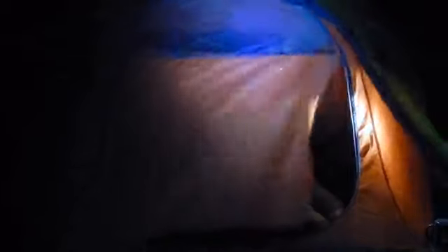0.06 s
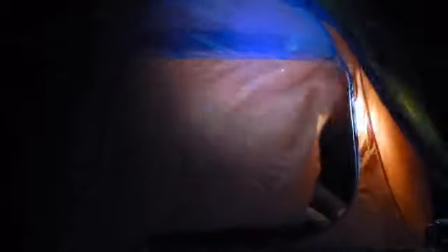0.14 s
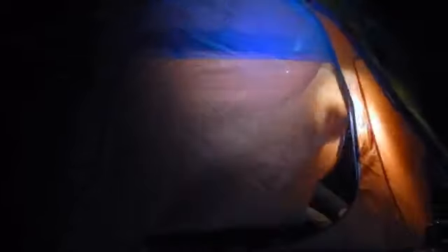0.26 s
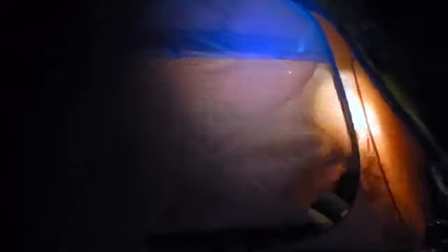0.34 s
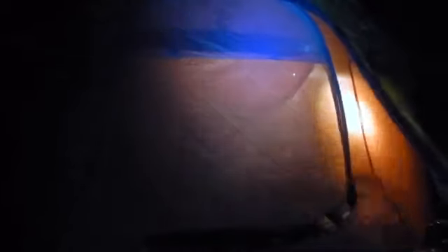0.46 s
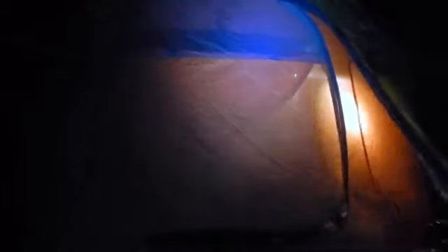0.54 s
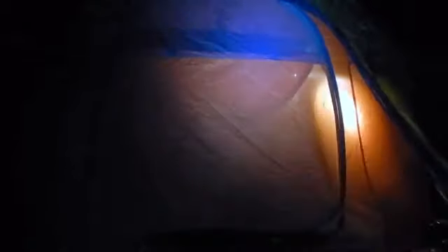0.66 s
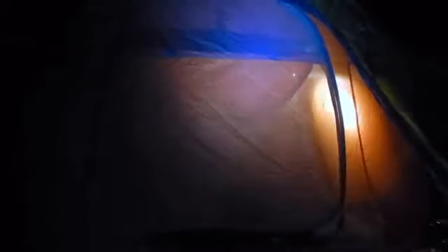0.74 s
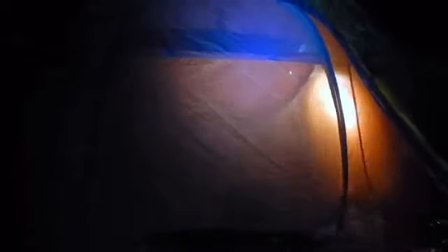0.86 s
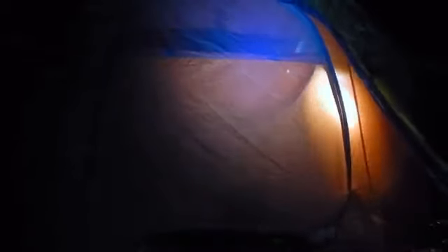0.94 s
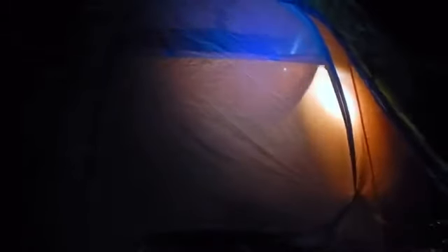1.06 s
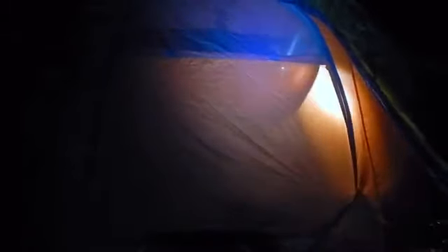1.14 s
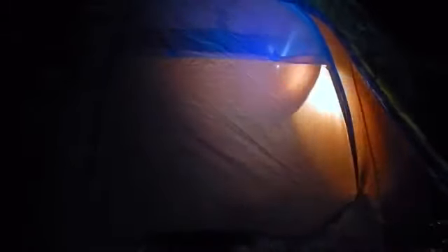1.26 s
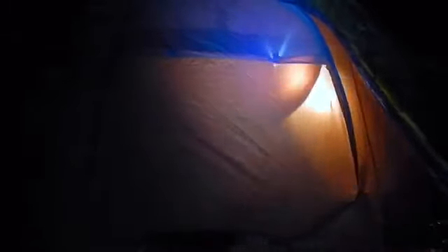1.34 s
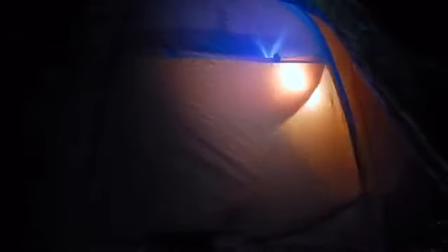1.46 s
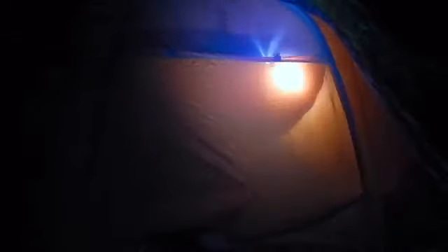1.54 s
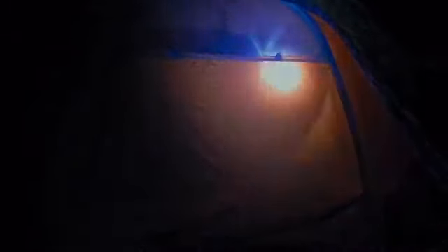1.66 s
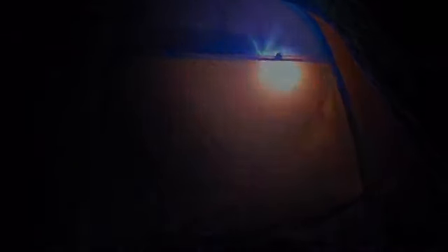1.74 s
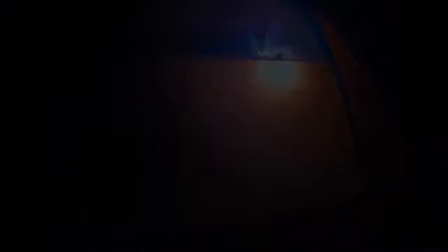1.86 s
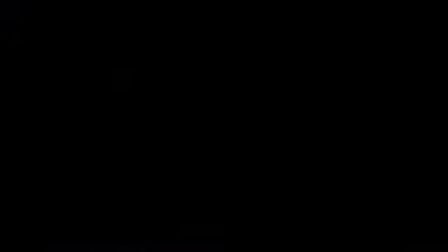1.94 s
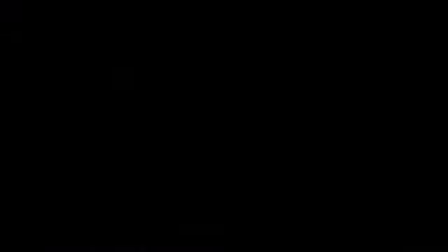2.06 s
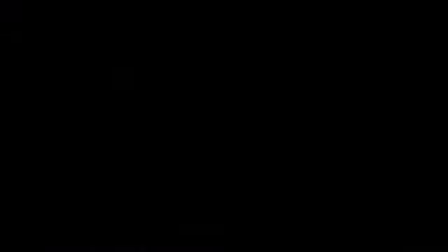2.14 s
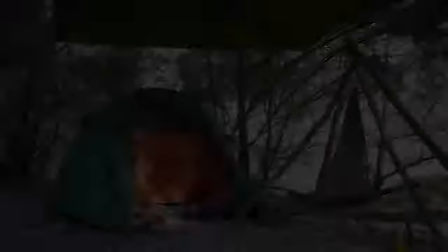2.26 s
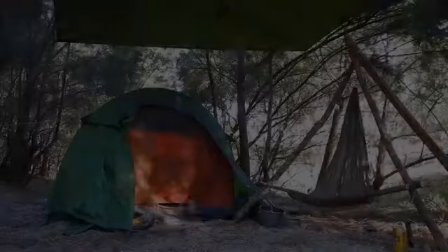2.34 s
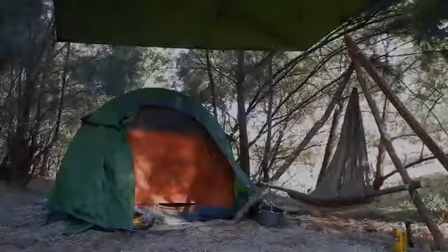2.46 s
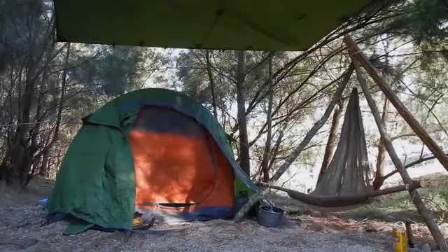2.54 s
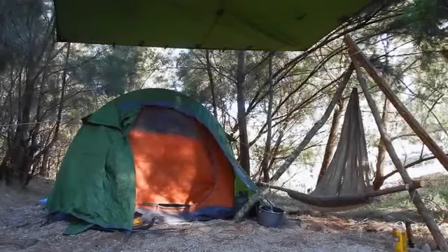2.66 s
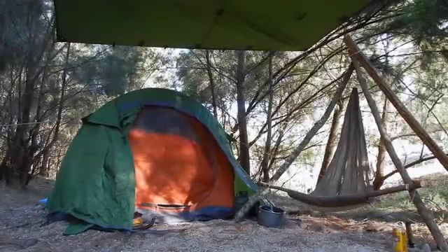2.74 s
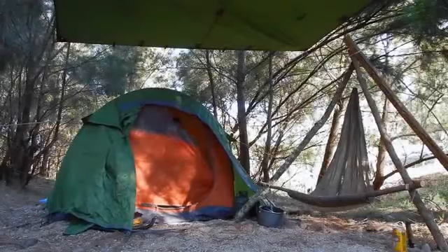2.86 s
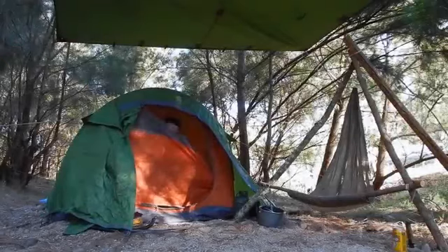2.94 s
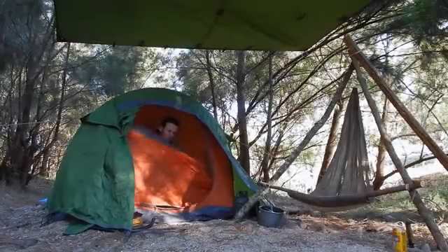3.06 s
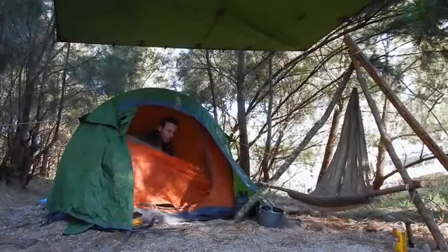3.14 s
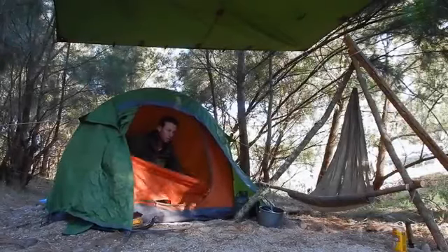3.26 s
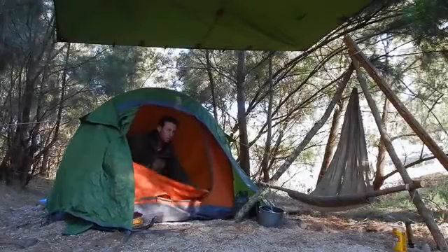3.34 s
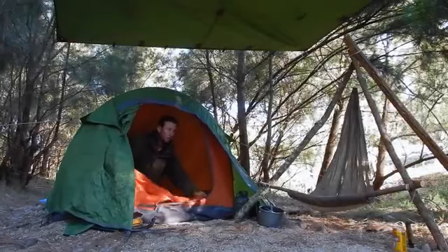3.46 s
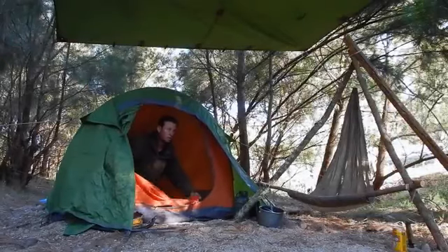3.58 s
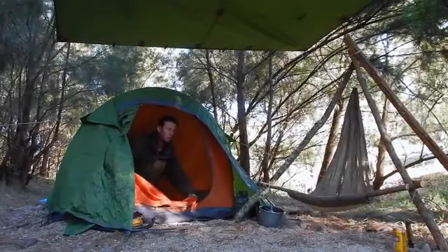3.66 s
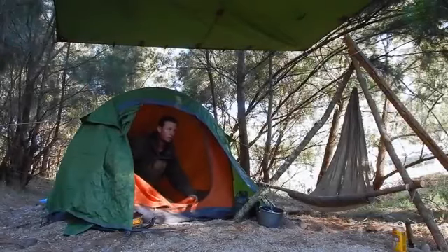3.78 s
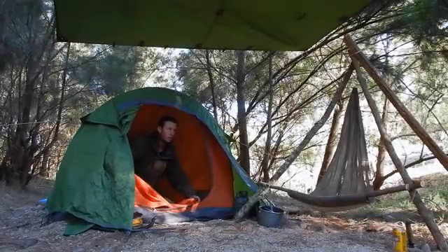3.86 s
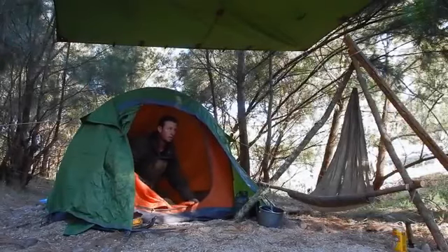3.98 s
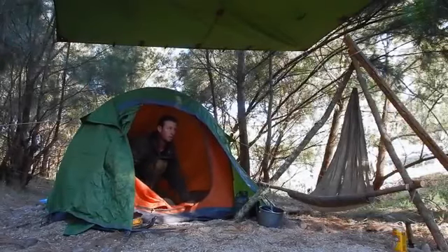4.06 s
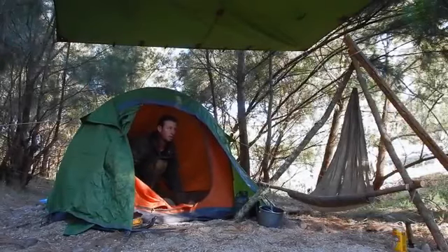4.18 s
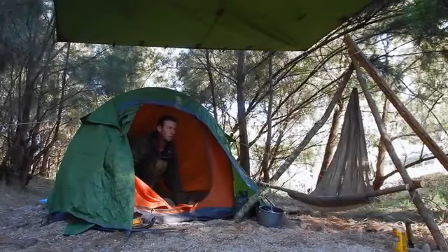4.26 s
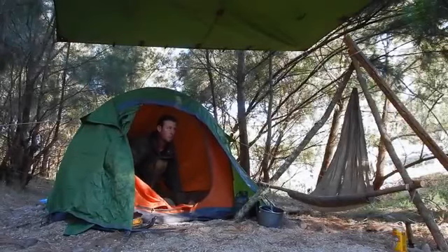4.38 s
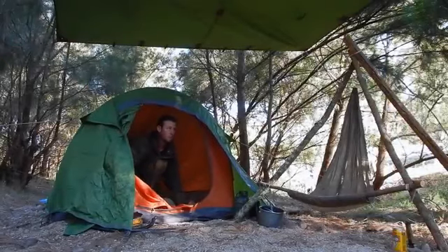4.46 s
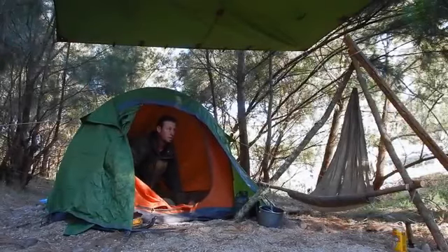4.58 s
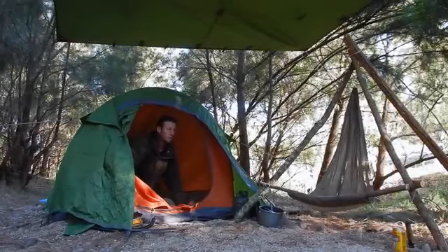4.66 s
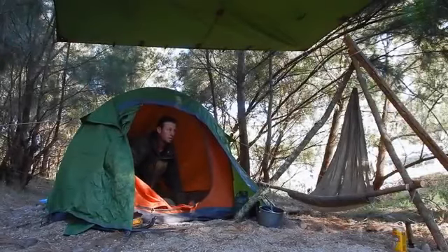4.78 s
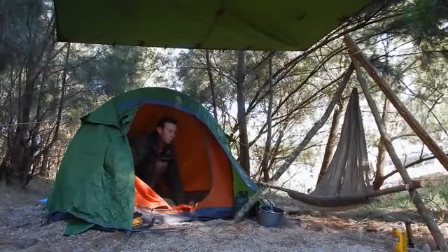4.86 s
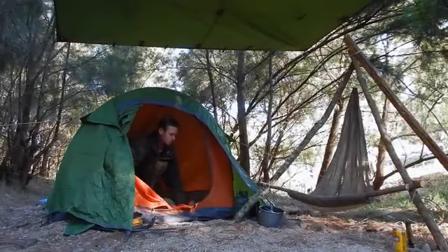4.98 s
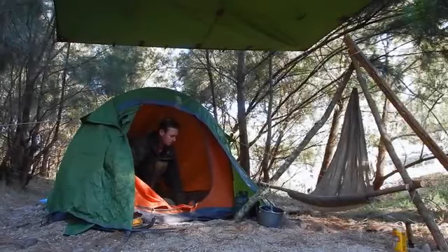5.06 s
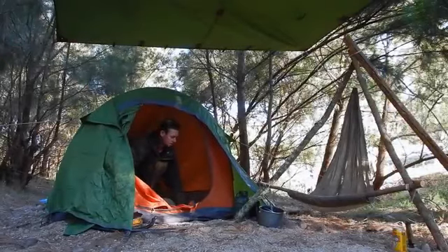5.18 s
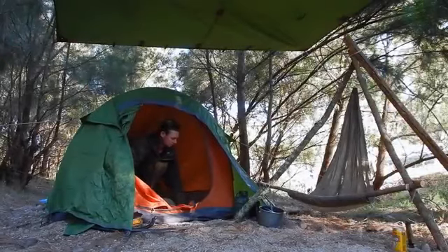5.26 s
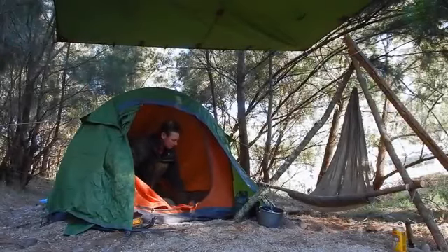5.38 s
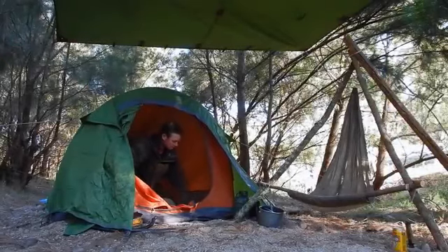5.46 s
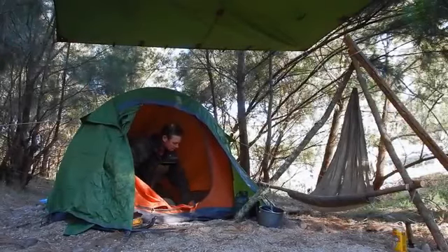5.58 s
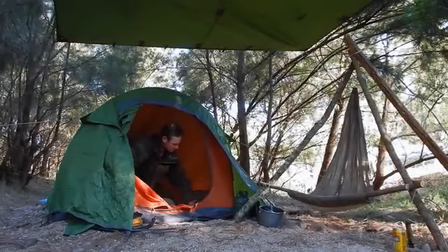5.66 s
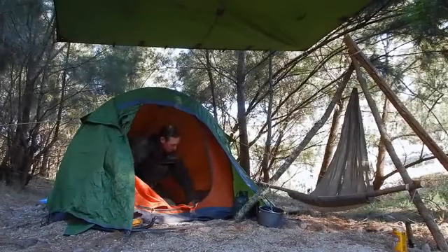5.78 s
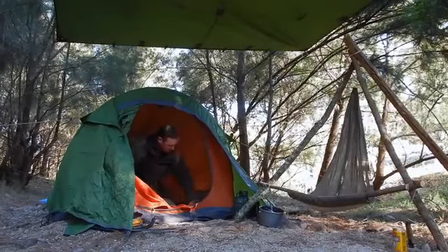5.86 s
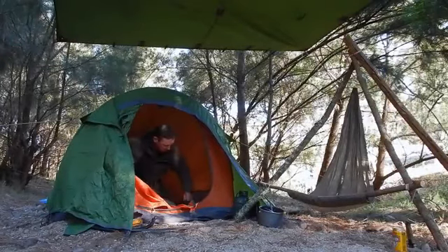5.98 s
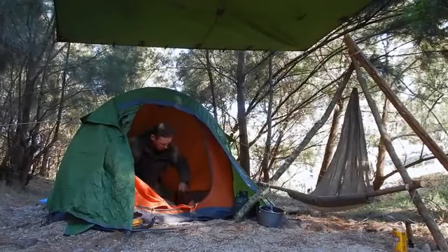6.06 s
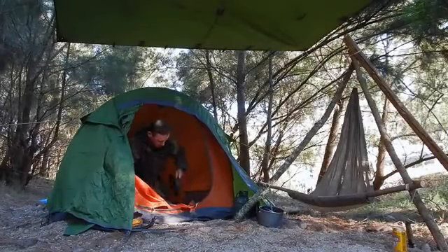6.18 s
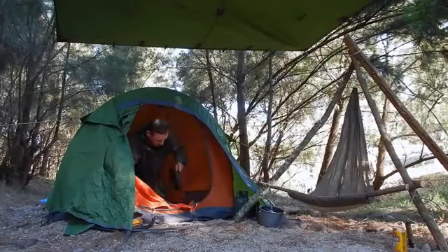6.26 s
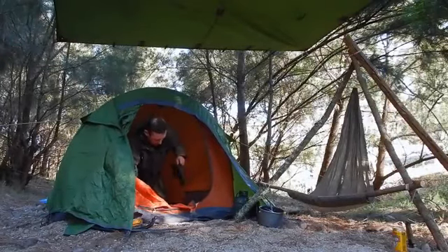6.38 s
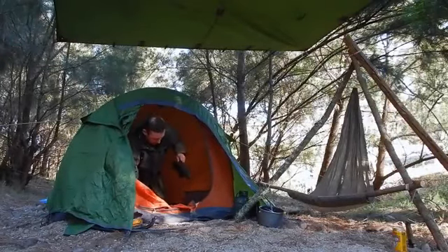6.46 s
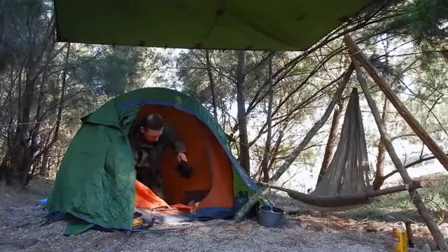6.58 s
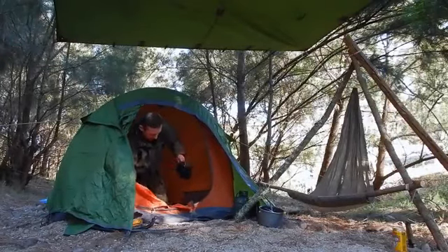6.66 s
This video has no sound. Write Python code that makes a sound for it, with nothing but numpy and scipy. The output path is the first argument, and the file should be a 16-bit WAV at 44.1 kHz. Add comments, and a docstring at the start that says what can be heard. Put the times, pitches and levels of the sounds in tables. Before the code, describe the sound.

Close, buzzing zip with stops and tugs, then a softer, quicker unzip farther away, small birds chirping, nylon rustling, insects droning behind.

```python
"""A zip buzzes close by as a tent door is shut, then more faintly as it is opened a few metres away.
Tooth impacts, friction noise and a hum at the tooth rate are shaped by tape and panel resonances;
the door flutters as filtered noise and thumps as damped modes. Small birds chirp as gliding sines,
nylon rustles as filtered noise, and behind them filtered noise makes a droning insect chorus
and a low rumble."""
import sys
import numpy as np
from scipy import signal
from scipy.fft import rfft, irfft, next_fast_len
from scipy.io import wavfile

SR = 44100
rng = np.random.default_rng(int(sys.argv[2]) if len(sys.argv) > 2 else 0)


def inscribe(sig):
    """Save sig as 16-bit PCM at rate SR to the path in sys.argv[1].

    A 1-D sig is mono; a 2-D sig holds one channel per row.
    Samples are clipped to [-1, 1] before scaling.
    """
    pcm = np.round(np.clip(np.atleast_2d(sig).T, -1, 1) * 32767)
    wavfile.write(sys.argv[1], SR, pcm.astype(np.int16))


N = 296352
TIME = np.arange(N) / SR
# teeth per s: above it the rattle fades, below it the overtones of the hum fade
SMOOTH_RATE = 940

# the slider's path close by, in four goes:
# t/s, tooth rate/(1/s), force/dB (only its change about the mean counts), freedom of the cloth to hum/dB
FIRST_PULL = [(0.0, 500, -25, 4.5), (0.028, 586, -25, -0.5), (0.064, 654, -24.5, 1), (0.088, 820, -21, 1.5),
              (0.108, 826, -22.5, 0.5), (0.128, 980, -24.5, 1.5), (0.146, 980, -24, -4.5),
              (0.16, 950, -24, 1), (0.18, 1050, -27.5, -7.5), (0.2, 948, -27.5, -3), (0.216, 674, -28, -14),
              (0.24, 645, -27.5, -6), (0.253, 545, -26.5, -13), (0.266, 337, -32, -5), (.285, 300, -34, -2)]
SECOND_PULL = [(0.308, 304, -35, -4), (0.334, 466, -32, -3), (0.348, 585, -29.5, -11),
               (0.366, 806, -32.5, 3), (0.41, 1055, -25.5, -21), (0.434, 1196, -26.5, -3),
               (0.458, 1228, -25.5, -0.5), (0.492, 1162, -27.5, -2), (0.512, 1056, -26, 1.5),
               (0.53, 897.4, -30, -5.5), (0.566, 682.3, -31, -7.5), (0.65, 456, -34, -4),
               (0.69, 553.7, -34.5, -5.5), (0.72, 585, -31.5, -4), (0.75, 489, -35, -7),
               (0.798, 245.9, -38, -1), (0.825, 160.2, -60, -1)]
CREEP = [(.87, 165, -48, 1), (.94, 185.2, -46.5, 0), (1.021, 125.2, -54, -3)]
SLOW_PULL = [(1.055, 214.4, -42, -2), (1.1, 228.3, -37.5, -0.5), (1.122, 285.5, -38.5, 4),
             (1.15, 230, -35.5, -2), (1.175, 294.8, -34, -1), (1.209, 268, -38.5, 1.5),
             (1.245, 305.2, -35, 6.5), (1.268, 304.4, -34.5, 4.5), (1.282, 349.6, -32, -2),
             (1.32, 379.6, -34, 2.5), (1.357, 361, -33, -2), (1.392, 404.3, -31, 4.5),
             (1.415, 399.6, -34, -3), (1.452, 459, -31.5, 0), (1.517, 270.3, -30.5, 1.5),
             (1.545, 370.3, -27.5, -3), (1.575, 489.5, -28, 0.5), (1.605, 458, -24, 1),
             (1.628, 488, -26, -3), (1.655, 465.7, -26.5, 2), (1.685, 399, -28, -2),
             (1.705, 479, -28.5, 0.5), (1.722, 500, -33.5, -1), (1.745, 570.5, -31, 1),
             (1.776, 580.4, -30, -6), (1.805, 624.8, -30, -3.5), (1.86, 630, -32, -7.5),
             (1.905, 595.3, -32, -0.5), (1.95, 439.4, -33, 1.5), (2.0, 374.2, -43, -3)]
LAST_TUG = [(2.03, 299.7, -39, -0.5), (2.052, 340, -43, 4), (2.064, 411, -34, 7), (2.078, 512.3, -31, 5),
            (2.096, 787.3, -27, -8), (2.115, 913, -28, -1.5), (2.138, 957, -25, -4),
            (2.152, 1047, -28.5, -14), (2.168, 1004, -32.5, -13), (2.185, 420, -36, -14),
            (2.222, 471.7, -31, -17), (2.26, 258, -43, -17)]
# resonances of the door panel, which differ from go to go: f/Hz, relative level/dB
FIRST_PANEL = [(290, -0.5), (400, -4), (500, -8.5), (600, 0.5), (665, -1), (710, -7), (790, -14), (900, 1),
               (980, 0), (1050, -1.5), (1200, 7), (1330, -10), (1480, 1), (1700, 5), (1870, -2),
               (2050, 6.5)]
SECOND_PANEL = [(200, 0.5), (300, -9), (400, -8), (480, 3), (580, 3), (680, 0), (800, 2), (900, 0.5),
                (1100, -18), (1230, -15), (1400, 11), (1650, -6), (1900, 9), (2100, 14.5), (2330, 14),
                (2470, 5.5)]
SLOW_PANEL = [(130, -9), (220, 3.5), (300, -2.5), (400, -1), (470, 2.5), (570, 0.5), (640, -6.5), (750, -4),
              (950, -16), (1140, -4), (1300, 4)]
LAST_PANEL = [(300, 2.5), (430, 5), (520, 1), (680, -26), (800, -7), (960, 4), (1200, 5), (1600, -1),
              (1820, 10.5), (2100, -4)]
GOES = [(FIRST_PULL, FIRST_PANEL), (SECOND_PULL, SECOND_PANEL),
        (CREEP + SLOW_PULL, SLOW_PANEL), (LAST_TUG, LAST_PANEL)]
# slackness of the closing door: t/s, level/dB
SLACK = [(.03, -17.5), (.11, -8), (.18, -5), (.24, -1), (.45, -4), (.7, -5.5), (1.05, -1), (1.65, -1),
         (1.85, 2), (2.14, 3), (2.26, -2)]


def from_db(db):
    """Amplitude ratio: a gain of ten for every 20 dB."""
    return 10 ** (np.asarray(db) / 20)


def rms_one(x):
    """Normalisation to unit rms amplitude."""
    return x / np.sqrt(np.mean(x ** 2) + 1e-20)


def in_time(rows):
    """Linear interpolation of each column of a curve over time."""
    s, *columns = np.transpose(rows)
    return [np.interp(TIME, s, c) for c in columns]


def at_hz(points, hz):
    """Interpolation of a spectrum on a logarithmic frequency axis."""
    f, value = np.transpose(points)
    return np.interp(np.log(hz + 1e-3), np.log(f), value)


def panned(x, pan_db):
    """Level-difference stereo: half of pan_db is added on the left and taken off on the right."""
    return x * from_db(np.array([[.5], [-.5]]) * pan_db)


def drift(rate):
    """Low-passed Gaussian noise of unit rms: a random fluctuation slower than about `rate` in Hz."""
    # computed on every 20th sample; the first 2000 values let the filter settle
    r = np.exp(-40 * np.pi * rate / SR)
    white = rng.standard_normal(N // 20 + 2002)
    slow = signal.lfilter([1], [1, -2 * r, r * r], white)[2000:]
    return np.interp(np.arange(N) / 20, np.arange(len(slow)), rms_one(slow))


def swells(rows):
    """Sine-squared envelopes, one for each row of t/s, length/s, peak level/dB."""
    return sum(from_db(db) * np.sin(np.pi * np.clip((TIME - s) / length, 0, 1)) ** 2
               for s, length, db in rows)


def response(spectrum, size=4096):
    """Minimum-phase impulse response of unit energy, found by folding the cepstrum."""
    cepstrum = irfft(np.log(from_db(at_hz(spectrum, np.fft.rfftfreq(size, 1 / SR)))))
    cepstrum[1:size // 2] *= 2
    cepstrum[size // 2 + 1:] = 0
    impulse = irfft(np.exp(rfft(cepstrum)))
    return impulse / np.sqrt(np.sum(impulse ** 2))


def coloured(x, spectrum):
    """Convolution of a stereo sound with the impulse response of a body."""
    return signal.oaconvolve(x, response(spectrum)[None], axes=1)[:, :N]


def stereo_noise():
    """White noise whose coherence between left and right varies with frequency."""
    # likeness of left and right: f/Hz, coherence 0-1
    likeness = [(40, 0.9), (125, 0.53), (250, 0.71), (1000, 0.43), (2300, 1), (4000, 0.26), (6000, 0.02),
                (12000, 0)]
    size = next_fast_len(N)
    alike = np.clip(at_hz(likeness, np.fft.rfftfreq(size, 1 / SR)), 0, 1)
    mid, side = rfft(rng.standard_normal((2, size)))
    both = np.sqrt(1 + alike) * mid + np.sqrt(1 - alike) * side * [[1], [-1]]
    return rms_one(irfft(both, size)[:, :N])


def zipper(goes, grinds, hiss_colour, slack_db, hum_db, octave_db, rattle_db, hiss_db, jitter, wobble_db,
           uneven_db, rattle_share, hiss_share, snag_db, grain, hiss_pan_db, tape_db, blur):
    """Periodic excitation: the slider rocks once per tooth, so cloth hums and teeth click and scrape."""
    # the tape's resonances for the upper harmonics: f/Hz, relative level/dB
    tape_rings = [(900, -9), (1100, -3), (1350, -7.5), (1550, -8.5), (1800, -2.5), (2000, -10),
                  (2300, -6.5), (2600, -13.5), (2950, -3), (3200, -18), (3600, -9), (4200, -13),
                  (4800, -10), (5400, -25)]
    # colour of the rattle: f/Hz, relative level/dB
    rattle_colour = [(300, -20.5), (700, -9), (1100, -4), (1500, -3), (2100, 3.5), (2600, 5), (3100, -4.5),
                     (4500, -39.5)]
    hum_follows, rattle_follows = 0.56, 0.96   # dB per dB of force
    rattle_fade_db, overtone_fade_db = 1, 6   # dB per octave of tooth rate
    # dB per dB: a slack door hums less, rattles more and makes the slider run unevenly
    slack_mutes, slack_rattles, slack_jitters = 0.23, 0.46, 0.4035
    # random phase of the hum, and the power by which it grows as the slider slows
    hum_rough, crawl_roughens = .2, .55

    rate, force_db, free_db, moving = hand(goes)
    octaves = np.log2(rate / SMOOTH_RATE)
    drive_db = hum_db + free_db + hum_follows * force_db - slack_mutes * slack_db
    overtone_db = drive_db + overtone_fade_db * np.minimum(octaves, 0)
    teeth_db = rattle_db + rattle_follows * force_db + slack_rattles * slack_db
    teeth_db = teeth_db - rattle_fade_db * np.maximum(octaves, 0)

    # a slow slider sticks and slips, a fast one runs more evenly
    loose = from_db(slack_jitters * slack_db) * np.ones(N)
    rate = rate * np.exp(jitter * loose * (500 / rate) ** .8 * drift(70.22))
    turns = np.cumsum(rate) / SR   # teeth passed so far

    # the panel shapes harmonics 1 and 2, the tape 3 and 4
    lower_db = [drive_db + panel_db(goes, rate), overtone_db + panel_db(goes, 2 * rate) + octave_db]
    upper_db = [overtone_db + at_hz(tape_rings, k * rate) + tape_db for k in range(3, 5)]
    rough = blur * loose * hum_rough * (SMOOTH_RATE / rate) ** crawl_roughens
    hum = np.zeros(N)
    for k, db in enumerate(lower_db + upper_db, 1):
        gain = np.sqrt(2) * from_db(db + wobble_db * np.sqrt(k) * drift(58))
        hum += gain * np.cos(2 * np.pi * k * turns + rough * k ** 0.82 * drift(310))

    clicks = tooth_clicks(turns, rate, loose, uneven_db)
    # friction is strongest just after each tooth enters
    scrape = stereo_noise() * rms_one(np.exp(-grain * (turns % 1)))

    def rasp(click_share, level_db, colour):
        """Source-filter principle: clicks and friction, swelling at each snag, drive one body."""
        share = np.clip(click_share, 0, 1)
        snags = rms_one(from_db(snag_db * drift(58)))
        source = np.sqrt(share) * clicks + np.sqrt(1 - share) * scrape
        return coloured(source * snags * from_db(level_db), colour)

    hiss = rasp(hiss_share, hiss_db + force_db, hiss_colour)
    hiss = off_the_panels(hiss, echo_share=0.67, lag_s=0.000955, sway=0.225, skew=0.0061)
    rattle = rasp(rattle_share, teeth_db, rattle_colour)
    grind = grinding(clicks + scrape / 2, grinds)
    return (hum + grind + rattle + panned(hiss, hiss_pan_db)) * moving


def hand(goes):
    """Kinematics of the pull: tooth rate, force about its mean (dB), cloth freedom (dB), on-off gate."""
    path = [row for pull, panel in goes for row in pull]
    rate, force_db, free_db = in_time(path)
    start, end = path[0][0], path[-1][0]
    moving = np.interp(TIME, [start - .02, start, end, end + .02], [0, 1, 1, 0])
    return rate, force_db - np.average(force_db, weights=moving), free_db, moving


def panel_db(goes, hz):
    """Forced resonance: the door's level at a moving frequency, with its own modes in each go."""
    out = at_hz(goes[0][1], hz)
    for pull, panel in goes[1:]:
        start = int(pull[0][0] * SR)
        out[start:] = at_hz(panel, hz[start:])
    return out


def tooth_clicks(turns, rate, loose, uneven_db, slop=.058, slop_s=.00005, catch_chance=.06, catch_db=5,
                 row_db=2.4):
    """Quasi-periodic impulse train: one click per tooth, less regular on a loose door or at a crawl."""
    at = np.flatnonzero(np.diff(np.floor(turns)) > 0)
    size, timing = np.clip(rng.standard_normal((len(at), 2)), -2, 2).T
    period = SR / rate[at]   # samples
    crawl = 500 / np.maximum(rate[at], 300)
    # some teeth catch with a snap
    caught = rng.random(len(at)) < catch_chance * (loose[at] * crawl) ** 2
    # the two rows of teeth are unequally strong
    row = (-1) ** np.arange(len(at))
    strength_db = uneven_db * np.sqrt(crawl) * size + catch_db * caught + row_db * row
    strength = rms_one(from_db(strength_db)) * np.sqrt(period)
    stray = np.maximum(slop * loose[at] ** 2 * crawl * period, slop_s * SR) * timing
    when = np.clip(at + (np.ceil(turns[at]) - turns[at]) * period + stray, 0, N - 2)
    # each click is shared between the two nearest samples
    at, late = when.astype(int), when % 1
    return np.bincount(at, strength * (1 - late), N) + np.bincount(at + 1, strength * late, N)


def grinding(teeth, grinds):
    """Band-pass resonance: where the slider binds, the teeth briefly drive one mode of tape and slider."""
    width = 0.17   # share of the centre frequency
    out = np.zeros((2, N))
    for s, length, hz, db in grinds:
        at = np.arange(int(s * SR), int((s + length) * SR))
        band = [hz * (1 - width / 2), hz * (1 + width / 2)]
        ring = signal.sosfilt(signal.butter(2, band, "band", fs=SR, output="sos"), teeth[:, at])
        out[:, at] += from_db(db) * rms_one(ring) * np.sqrt(np.hanning(len(at)))
    return out


def off_the_panels(x, echo_share, lag_s, sway, skew):
    """Comb filtering: flexing tent walls return the rasp with a wavering lag, unequal on the two sides."""
    out = x.copy()
    for path in (1, 2):
        lag = path * lag_s * np.exp(sway * drift(5.4))
        for side in (0, 1):
            out[side] += echo_share * np.interp(TIME - lag * (1 + skew * side), TIME, x[side])
    return out / np.sqrt(1 + 2 * echo_share ** 2)


def ticks(crack_s, crack_share):
    """Impact excitation: each knock of the tab or catch of the slider is a click with a short scratch."""
    # knocks and catches: t/s, relative level/dB, brightness 0-1
    knocks = [(0.256, -17, 0), (0.393, 7, 0.45), (0.931, -11.5, 0), (.971, -16, 0.01), (1.062, -9, 0.03),
              (1.1022, -5, 0.04), (1.115, -5.5, 0.03), (1.271, -11, 0.2), (1.308, -10, 0.02),
              (1.363, -5, 0.11), (1.3857, -2, 0), (1.392, 0, .01), (1.4809, -1, .05), (1.698, -9, 0),
              (2.148, 7, 0.64), (2.172, -9, 0.32), (2.19, -4, 0.05), (2.268, -13, 0.04), (2.289, -10, 0.19),
              (2.3116, -8.5, 0.13), (2.564, -23.5, .5)]
    # colours of a dull and a bright knock: f/Hz, relative level/dB
    dull_colour = [(200, -40), (800, 4), (1400, 5.5), (2600, 9.5), (3600, 2), (4700, 5.5), (5800, -12),
                   (9000, -53), (13000, -57)]
    bright_colour = [(1000, -7), (4500, 23.5), (6500, -4), (12000, 3), (15000, -30)]
    dull, bright = np.zeros((2, 2, N))
    age = np.arange(SR // 50) / SR
    for s, db, brightness in knocks:
        knock = crack_share * rng.standard_normal((2, len(age))) * np.exp(-age / crack_s)
        knock[:, 0] = 1
        span = slice(int(s * SR), int(s * SR) + len(age))
        dull[:, span] += from_db(db) * (1 - brightness) * knock
        bright[:, span] += from_db(db) * brightness * knock
    return coloured(dull, dull_colour) + coloured(bright, bright_colour)


def thuds(detune):
    """Modal decay: each jump of a tooth rings the taut door's low modes, at a slightly varied tension."""
    # jumps of the slider: t/s, level/dB
    jumps = [(.781, -29), (.793, -29), (.872, -31), (.892, -26.5), (.914, -28), (.931, -25), (.947, -27),
             (.958, -32), (1.044, -27), (1.062, -19), (1.083, -27), (1.097, -22), (1.103, -24.5),
             (1.116, -21), (1.186, -26), (1.525, -23), (1.698, -22), (1.985, -28)]
    # modes of the door: f/Hz, level/dB, decay time t60/s
    door_modes = [(149, -13.5, .07), (218, -2, 0.063), (295, -7, 0.047), (432.9, -10, .025)]
    out, age = np.zeros(N), np.arange(SR // 8) / SR
    tensions = np.exp(detune * rng.standard_normal(len(jumps)))   # factor on every mode's frequency
    for (s, db), tension in zip(jumps, tensions):
        ring = sum(from_db(db + mode_db - 60 * age / t60) * np.sin(2 * np.pi * hz * tension * age)
                   for hz, mode_db, t60 in door_modes)
        out[int(s * SR):int(s * SR) + len(age)] += ring
    return out


def cloth_flutter(level_db, per_octave_db, follows, lumpy_db):
    """Amplitude-modulated noise: the door shakes most when it is slack and the slider slow."""
    # the door jerks as the slider stops or starts, and at last flops down: t/s, length/s, level/dB
    jerks = [(.198, 0.017, -48), (.765, 0.061, -45), (.91, 0.058, -41), (1.06, .12, -43),
             (1.485, 0.092, -31), (1.58, 0.22, -40), (2.125, 0.056, -28.5), (2.285, 0.021, -32),
             (3.35, 0.35, -40.5)]
    # colour of the shaken cloth: f/Hz, relative level/dB
    cloth_colour = [(40, -15.5), (100, 1.5), (180, 4), (330, 0.5), (500, 0), (750, -11), (1300, -53)]
    rate, force_db, _, moving = hand(GOES)
    shake_db = level_db + in_time(SLACK)[0] + follows * force_db
    shake_db = shake_db + per_octave_db * np.log2(rate / SMOOTH_RATE)
    shake = from_db(shake_db + lumpy_db * drift(17.3)) * moving
    return coloured(stereo_noise() * (shake + swells(jerks)), cloth_colour)


def birds(flutter_db):
    """Frequency modulation: each note is a near sine that bends through three pitches."""
    # short notes that drop onto their pitch: t/s, f/Hz, level/dB
    hooks = [(2.414, 4950, -35), (2.546, 4620, -26.5), (2.578, 4670, -33), (2.744, 5960, -34),
             (2.856, 4940, -26.5), (2.88, 6100, -45.5), (3.046, 6354, -39.5), (3.458, 3993, -37),
             (3.595, 3920, -36.5)]
    # notes that rise and fall: t/s, length/s, top f/Hz, level/dB
    arches = [(2.315, 0.046, 6120, -55.5), (3.088, 0.072, 5020, -38), (3.112, 0.074, 6050, -48),
              (3.256, 0.091, 5350, -47.5), (3.417, .055, 5514, -48), (3.521, .095, 5470, -46.5)]
    # thin, straight whistles: t/s, length/s, start f/Hz, end f/Hz, level/dB
    whistles = [(1.97, 0.17, 6390, 6157, -53), (2.782, 0.051, 6470, 6430, -44),
                (3.338, 0.037, 6470, 6660, -41.5), (3.654, 0.13, 6800, 7120, -54.5),
                (3.743, 0.067, 6780, 7400, -44.5), (3.862, .07, 5980, 5760, -35),
                (3.897, .124, 5780, 5790, -28), (5.32, .035, 5800, 5650, -60.5),
                (5.465, .09, 6220, 6050, -64), (5.69, 0.053, 5340, 5320, -55),
                (5.782, 0.1, 5700, 5500, -55.5), (5.9, 0.076, 4730, 4590, -49),
                (5.967, 0.096, 4730, 4700, -47.5), (6.08, 0.1, 4640, 4460, -49)]
    # the birds sit to the left: f/Hz, left-right level/dB
    bird_pan = [(4000, 7), (4650, 2.5), (5000, 5), (5400, 8), (5900, 12), (7200, 12.5)]
    hook_s = 0.0281
    hook_drop, arch_bend, waver = 0.111, 0.0905, .004   # shares of the pitch

    notes = [(s, hook_s, [hz * (1 + hook_drop), hz, hz], db) for s, hz, db in hooks]
    notes += [(s, length, [hz * (1 - arch_bend), hz, hz * (1 - arch_bend)], db)
              for s, length, hz, db in arches]
    notes += [(s, length, [start, (start + end) / 2, end], db)
              for s, length, start, end, db in whistles]
    out, wander, flutter = np.zeros((2, N)), drift(200), drift(40)
    for s, length, pitches, db in notes:
        at = np.arange(int(s * SR), min(N, int((s + length) * SR)))
        u = np.linspace(0, 1, len(at))
        # a parabola through the three pitches
        hz = np.polyval(np.polyfit([0, .5, 1], pitches, 2), u) * (1 + waver * wander[at])
        swell = np.sqrt(2) * np.abs(np.sin(np.pi * u ** 1.62)) ** 0.69
        gain = from_db(db + flutter_db * flutter[at]) * swell
        note = gain * np.sin(2 * np.pi * np.cumsum(hz) / SR)
        out[:, at] += panned(note, at_hz(bird_pan, pitches[1]))
    return out


def sleeve(rest_db, rough, crinkle_db):
    """Sliding friction: nylon rustles as noise; a stroke over its ribs gives a rough gliding whistle."""
    # cloth rustles as the tug ends, and later as the camper shifts about: t/s, length/s, level/dB
    rustles = [(2.255, 0.1, -34.5), (3.25, 0.8, -49), (4.5, 0.69, -61), (5.96, 0.21, -39.5),
               (6.1, 0.8, -43)]
    # nylon slides over ribbed nylon: t/s, length/s, start f/Hz, end f/Hz, level/dB
    swishes = [(2.478, 0.062, 4250, 2700, -37.5), (4.668, 0.13, 2850, 3340, -43.5),
               (4.826, 0.11, 3350, 4960, -49), (6.04, 0.065, 2600, 4100, -38.5)]
    # colour of the rustle: f/Hz, relative level/dB
    nylon_colour = [(1500, -15.5), (3000, 1), (3900, -0.5), (4800, 2.5), (5500, -5), (6300, -19),
                    (8000, -27), (12000, -41.5), (14000, -46.5)]
    rustle = np.hypot(from_db(rest_db), swells(rustles)) * from_db(crinkle_db * drift(40))
    out = coloured(stereo_noise() * rustle, nylon_colour)
    wander = drift(370)
    for s, length, start, end, db in swishes:
        at = np.arange(int(s * SR), int((s + length) * SR))
        hz = np.geomspace(start, end, len(at)) * (1 + rough * wander[at])
        whistle = np.sin(2 * np.pi * np.cumsum(hz) / SR)
        out[:, at] += np.sqrt(2) * from_db(db) * np.hanning(len(at)) * whistle
    return out


def trees(x):
    """Diffuse reverberation: echoes off trunks and tarp build up, then decay exponentially."""
    t60_s, build_s = 0.36, .02
    age = np.arange(SR) / SR
    tail = stereo_noise()[:, :SR] * from_db(-60 * age / t60_s) * (1 - np.exp(-age / build_s))
    tail /= np.sqrt(np.sum(tail ** 2, axis=1, keepdims=True))
    return signal.oaconvolve(x, tail, axes=1)[:, :N]


def bush(swell_db, chorus_pan_db):
    """Incoherent summation: countless far insects merge into droning noise bands above a low rumble."""
    # the chorus dips and then grows, the rumble grows: t/s, chorus level/dB, rumble level/dB
    bush_levels = [(0, -38.5, -48.5), (1.7, -44, -42), (2.5, -35, -41), (4.3, -35, -40.5),
                   (6.72, -33, -37.5)]
    # colours: f/Hz, relative level/dB
    chorus_colour = [(600, -25), (880, -12), (990, -1.5), (1110, 4), (1230, -4.5), (1360, -17),
                     (1460, -9.5), (1630, -17.5), (1850, -5), (2350, -3.5), (2700, -11.5), (3100, -19.5),
                     (4700, -30), (6500, -63.5)]
    rumble_colour = [(15, -6), (40, -10.5), (62, -5.5), (76, -0.5), (95, -4.5), (170, -7), (300, -13),
                     (480, -16), (750, -18.5), (2000, -21.5), (5000, -31.5), (7000, -63.5), (14000, -96.5)]
    chorus_db, rumble_db = in_time(bush_levels)
    chorus = coloured(stereo_noise(), chorus_colour) * from_db(chorus_db + swell_db * drift(9.0))
    rumble = coloured(stereo_noise(), rumble_colour) * from_db(rumble_db)
    return panned(chorus, chorus_pan_db) + rumble


def scene():
    """Superposition: close sounds dry, distant sounds with their reverberation, the bush behind."""
    # place of the slider: t/s, left-right level/dB
    slider_pan = [(.15, 0), (.42, -2.5), (1.8, -1), (2.2, -0.5), (3.6, -1)]
    # the opening pull, a few metres away: t/s, tooth rate/(1/s), force/dB (change about the mean counts),
    # freedom of the cloth to hum/dB
    opening = [(2.54, 350, -46.5, 10.5), (2.6, 560, -40.5, -8), (2.68, 806, -32.5, -9),
               (2.76, 700, -37, -4), (2.806, 548.1, -53.5, -12), (2.88, 764, -47, -4),
               (2.93, 1050, -36.5, -5.5), (2.975, 1090, -37, -2.5), (3.02, 1090, -36.5, -5),
               (3.08, 1140, -36.5, -7.5), (3.105, 1240, -39, 0), (3.135, 1270, -40.5, 4),
               (3.17, 1240, -42, 1.5), (3.2, 970, -43, -9), (3.235, 830, -42, -2), (3.262, 660, -45, 0),
               (3.3, 760, -41.5, -4.5), (3.362, 1000, -43, 0.5), (3.385, 880, -41.5, -2),
               (3.42, 1110, -43.5, -4), (3.456, 1130, -40.5, 1), (3.478, 840, -42, -1),
               (3.534, 500, -50.5, -8), (3.62, 336, -47.5, -1)]
    # panel resonances of the opening door: f/Hz, relative level/dB
    far_panel = [(250, -21), (600, -12.5), (750, -12.5), (950, -0.5), (1110, -2.5), (1260, 5), (1350, 6),
                 (1450, -2.5), (1700, 2.5), (1950, 4), (2080, -5), (2220, 1.5), (2400, 7), (2520, -15)]
    # the slider binds and grinds in short bursts: t/s, length/s, centre f/Hz, level/dB
    near_grinds = [(0.041, 0.038, 3370, -24), (0.115, .04, 2880, -23.5), (0.154, .024, 2850, -27),
                   (0.183, 0.062, 3080, -22.5), (0.2, .036, 3900, -25.5), (.28, 0.04, 3030, -33),
                   (0.333, 0.022, 3100, -31), (0.447, 0.055, 4570, -31), (1.098, 0.062, 1942, -38),
                   (1.256, 0.072, 1574, -33), (1.552, 0.053, 4280, -22.5), (1.58, 0.04, 3100, -26),
                   (1.615, 0.052, 1910, -33), (1.631, 0.044, 4550, -26), (1.656, .05, 2700, -27),
                   (1.738, 0.057, 1140, -32), (1.784, 0.039, 1930, -30), (1.84, .024, 2000, -25.5),
                   (1.877, 0.025, 1948, -27), (1.96, 0.072, 450, -37), (2.09, .11, 450, -35),
                   (2.131, 0.027, 2494, -24.5), (2.201, 0.039, 1350, -36)]
    far_grinds = [(2.6, 0.1, 4500, -41), (2.952, 0.036, 2220, -34), (3.062, .034, 2400, -30.5),
                  (3.08, 0.11, 4930, -38.5), (3.188, 0.03, 1890, -32.5), (3.245, 0.019, 1370, -35),
                  (3.328, 0.022, 2810, -33.5), (3.35, 0.031, 2000, -36), (3.392, 0.051, 1910, -32.5),
                  (3.46, 0.02, 4100, -38)]
    # colours of the hiss: f/Hz, relative level/dB
    near_hiss = [(1500, -34.5), (2400, 3.5), (2900, 0), (3700, -2), (4750, 3.5), (5200, -10.5),
                 (5700, -16.5), (7200, -21.5), (9000, -26.5), (12000, -25.5), (13500, -63)]
    far_hiss = [(1500, -38), (2400, -13), (2900, -2), (3700, -0.5), (4750, 7.5), (5200, 1), (5800, -10),
                (7500, -19), (9000, -34.5), (12500, -31.5), (14000, -58)]
    trees_db = -8.5

    slack_db, = in_time(SLACK)
    near = zipper(GOES, near_grinds, near_hiss, slack_db, hum_db=-32.5, octave_db=-2.5, rattle_db=-33.0,
                  hiss_db=-32.0, jitter=.056, wobble_db=2.5, uneven_db=1.0, rattle_share=0.85,
                  hiss_share=0.59, snag_db=0.6, grain=0.6, hiss_pan_db=-4.0, tape_db=2.5, blur=0.93)
    far = zipper([(opening, far_panel)], far_grinds, far_hiss, 0, hum_db=-36.0, octave_db=-6.5,
                 rattle_db=-46.5, hiss_db=-39.5, jitter=.04, wobble_db=3.0, uneven_db=3.0,
                 rattle_share=0.98, hiss_share=0.84, snag_db=2.5, grain=0.86, hiss_pan_db=0.5,
                 tape_db=-8.5, blur=1.26)
    slider_db, = in_time(slider_pan)
    close = panned(near + ticks(crack_s=0.0019, crack_share=0.058) + thuds(detune=.08), slider_db)
    close += cloth_flutter(level_db=-46.5, per_octave_db=-6.0, follows=0.68, lumpy_db=4.0)
    distant = panned(far, slider_db)
    distant += panned(sleeve(rest_db=-52.5, rough=0.058, crinkle_db=2.0), pan_db=1.0)
    distant += birds(flutter_db=0.7)
    echoes = from_db(trees_db) * trees(distant)
    return close + distant + echoes + bush(swell_db=1.34, chorus_pan_db=-2.0)


def record(dry):
    """Low-pass filtering: a steep filter holds everything above its stop-band edge 60 dB down."""
    stop_hz = 15000
    return signal.sosfilt(signal.cheby2(14, 60, stop_hz, fs=SR, output="sos"), dry)


dry = scene()
out = record(dry)
inscribe(out)
```